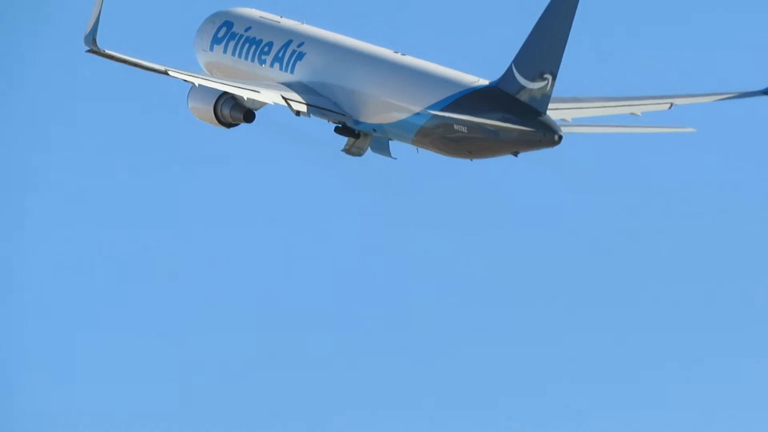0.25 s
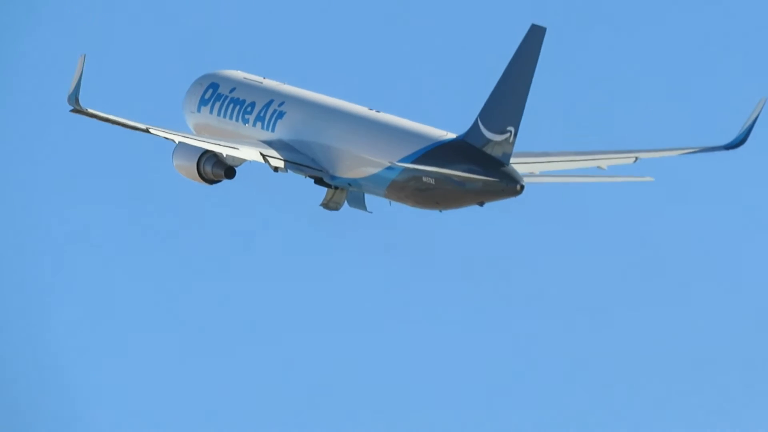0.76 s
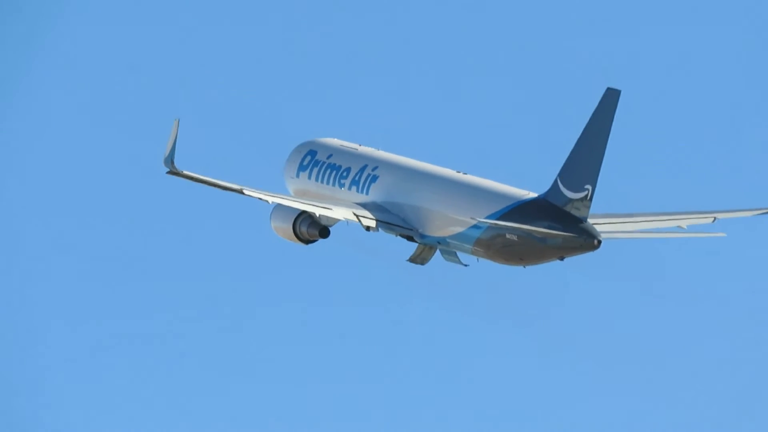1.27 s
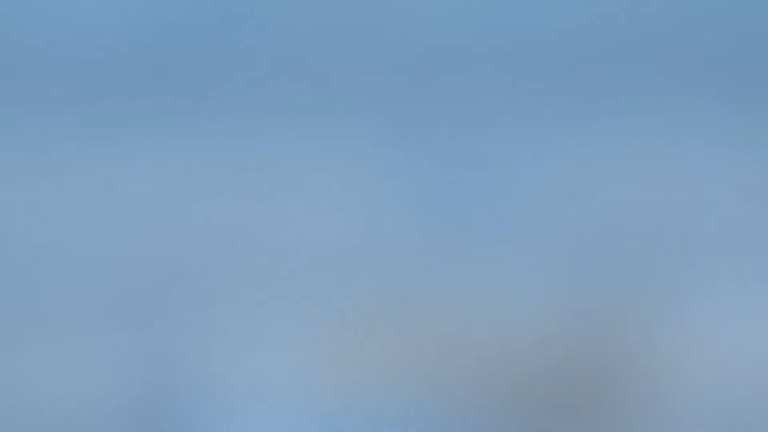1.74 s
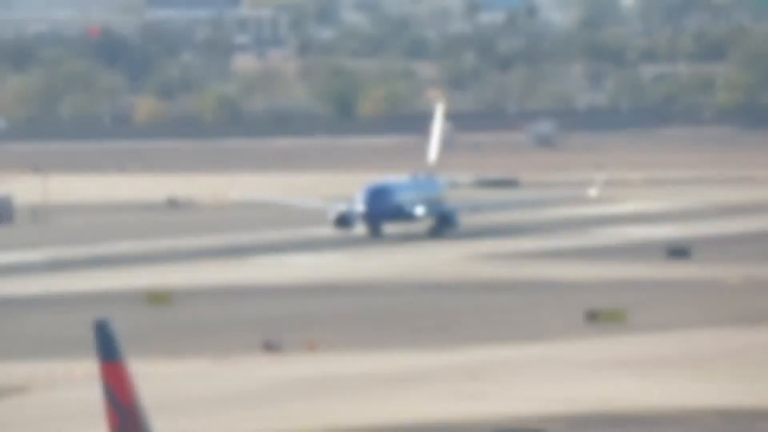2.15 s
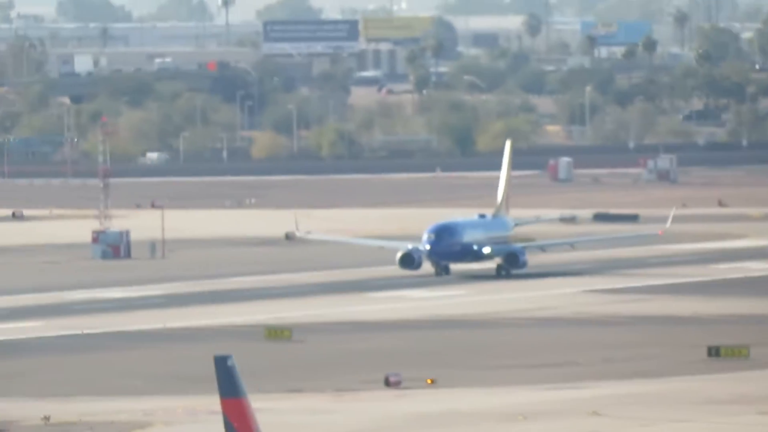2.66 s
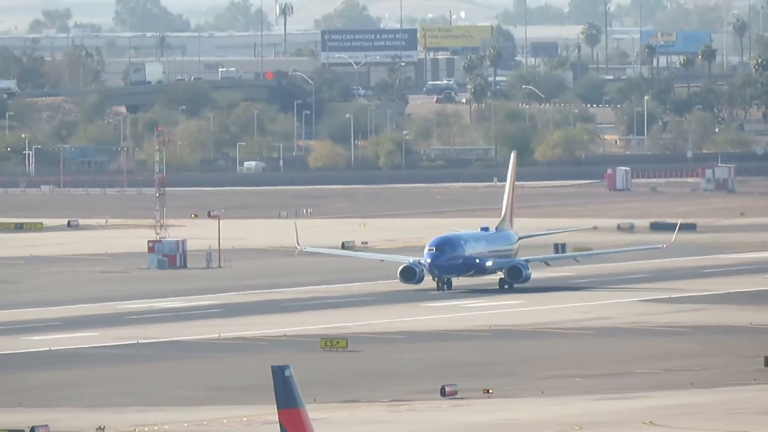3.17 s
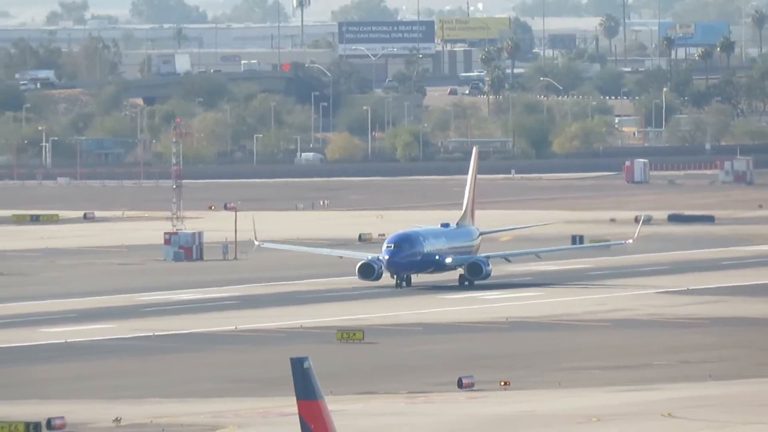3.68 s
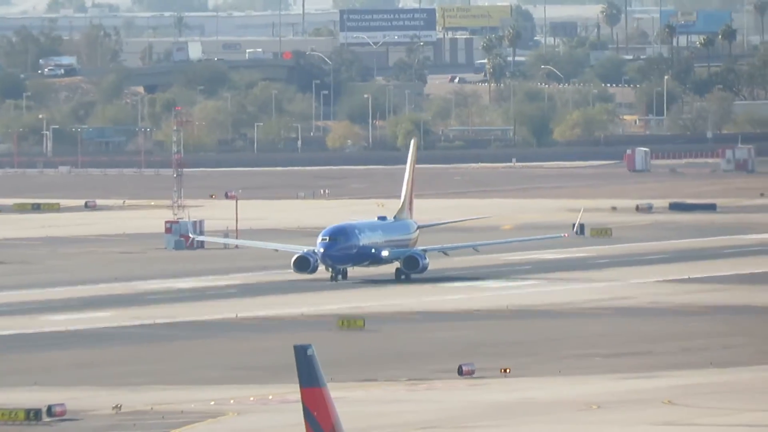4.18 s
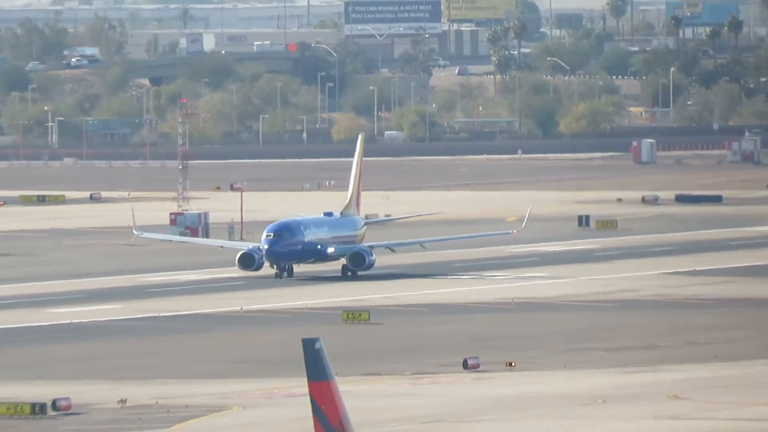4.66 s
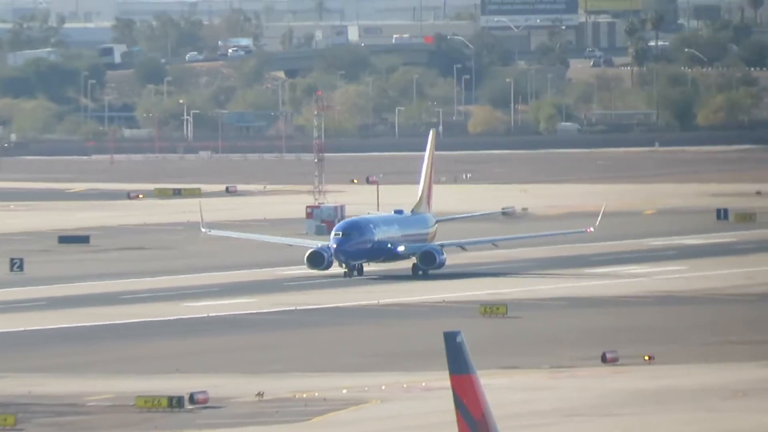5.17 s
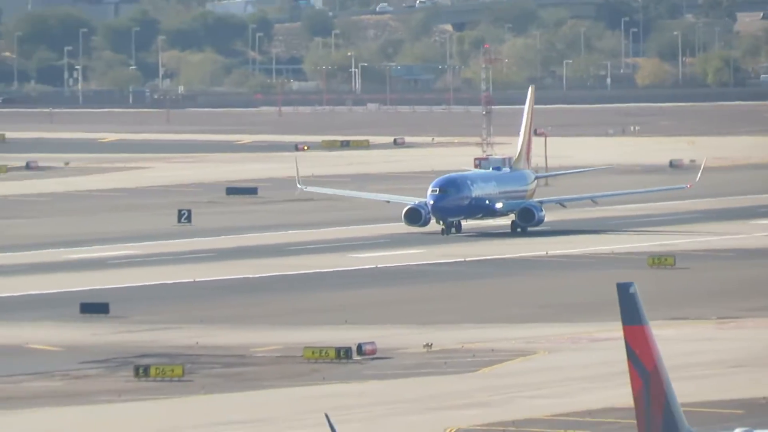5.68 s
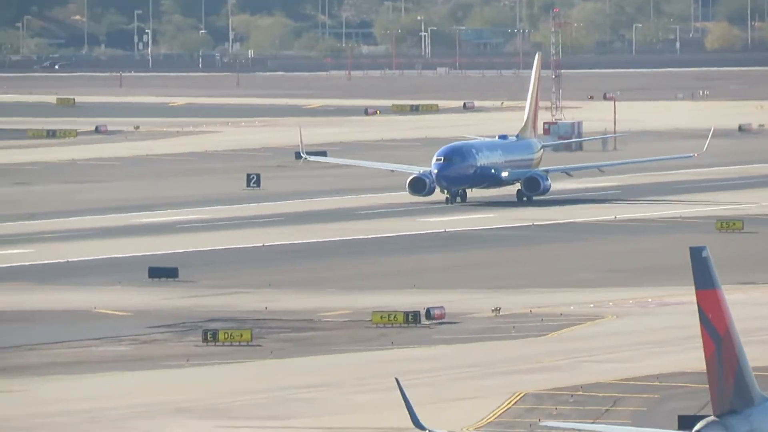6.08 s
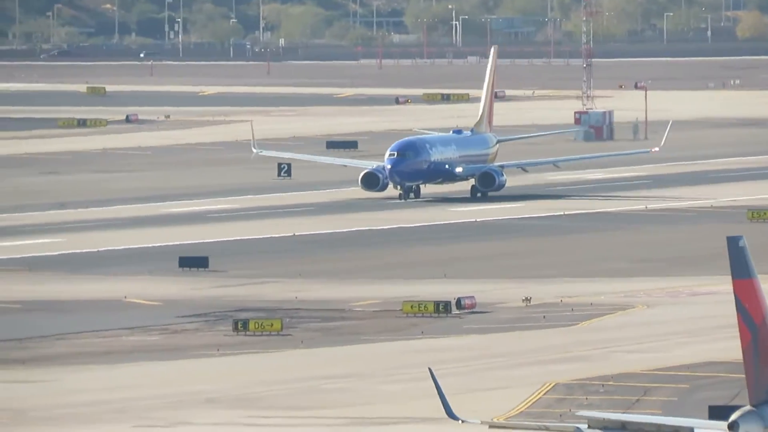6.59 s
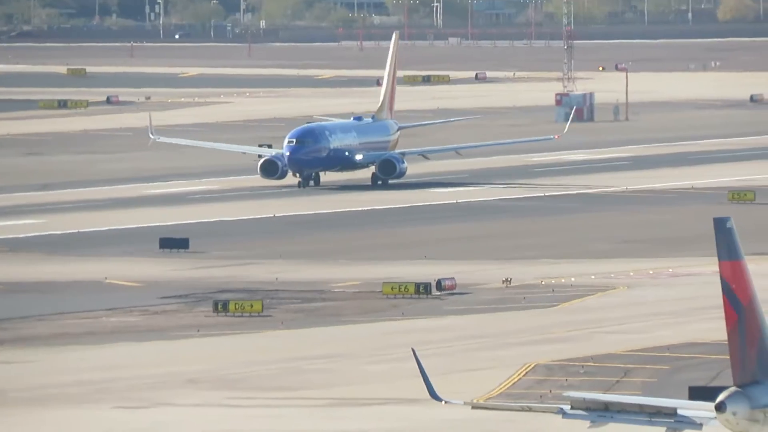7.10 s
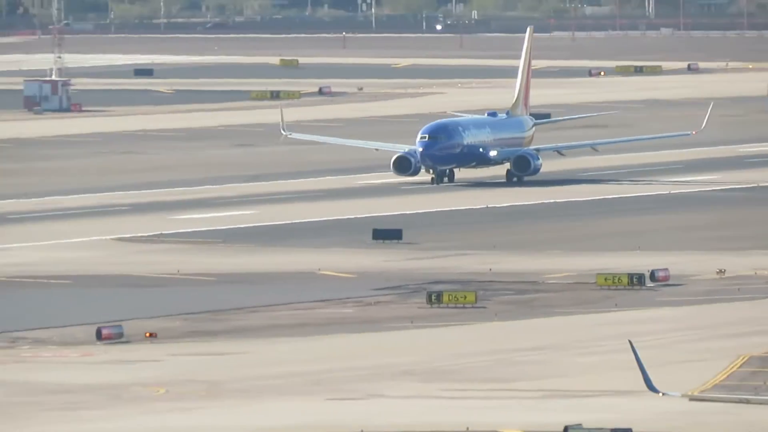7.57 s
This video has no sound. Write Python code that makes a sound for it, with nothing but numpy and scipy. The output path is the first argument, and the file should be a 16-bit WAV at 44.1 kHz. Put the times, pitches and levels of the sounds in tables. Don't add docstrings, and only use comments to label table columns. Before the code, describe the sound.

A climbing airliner roars deeply and unevenly across an open airfield, with a thin fan whine, then draws away. Handling ticks and skin rubbing on a plastic camera shell interrupt as it swings round. A second jet on the runway swells into a broad, steady roar with a faint wavering tone and low hum, still rolling at the end. Small stereo camera microphone, distant view.

```python
import sys
import numpy as np
from scipy import signal
from scipy.fft import rfft, irfft
from scipy.io import wavfile
from scipy.ndimage import uniform_filter1d, map_coordinates

SR = 44100
rng = np.random.default_rng(int(sys.argv[2]) if len(sys.argv) > 2 else 0)


def how_loud(loudness_db):
    steps = np.asarray(loudness_db, float) / 20
    return 10 ** steps


def persist_wave(psi):
    counts = np.round(np.clip(psi, -1, 1) * 32767).astype(np.int16)
    wavfile.write(sys.argv[1], SR, np.atleast_2d(counts).T)


N = 345744
T = np.arange(N) / SR
HZ = np.arange(N // 2 + 1) * SR / N
FRAME = dict(fs=SR, nperseg=1024, noverlap=768)

# (frequency [Hz], climbing jet [dB per Hz], rolling jet [dB per Hz])
EXHAUST = [(22, -63.5, -65), (46, -35, -52.5), (81.6, -38.5, -40.5), (132, -38, -46), (197.7, -42.5, -43.5),
           (237, -47, -50), (365, -49, -53), (983, -58.5, -63.5), (1363, -65, -69), (1915, -76.5, -71),
           (2860, -81, -79.5), (4500, -94.5, -91), (6180, -100.5, -96.5), (8460, -109, -105.5),
           (16600, -124, -123)]
# (frequency [Hz], width [Hz], gain [dB])
HOLLOWS = [(1950, 740, -0.5), (3100, 360, 2), (5800, 900, -3.5), (7550, 820, 0.5)]
# (frequency [Hz], width [Hz], level over roar [dB])
CLIMB_WHINE = [(313, 74, 5.5), (2090, 130, 3), (3881, 40, 1), (4285, 35, 2.5), (4801, 35, 4),
               (5300, 60, 2.5), (5505, 70, 4), (5605, 70, 6), (6062, 50, 5), (6660, 40, 3), (7411, 40, 1)]
ROLL_WHINE = [(777, 4.6, 5.4), (1484, 9.1, 5.3)]
# (frequency [Hz], width [Hz], mean level over roar [dB])
FITFUL_WHINE = [(3970, 60, 3.5), (4290, 46, 3.5), (4750, 80, 2), (5105, 55, 1.5), (5290, 66, 3),
                (5460, 70, 5.5), (5640, 60, 6), (5943, 60, 4.5), (6150, 80, 5.5), (7120, 60, 1),
                (7440, 50, 3), (7700, 50, 6.5), (8177, 90, 3)]
FITFULNESS, FIT_FRAMES = 0.6, 12

# (time [s], level [dB], deepening [dB per octave])
CLIMB_MOTION = [
    (.1, 2.5, 0.5),
    (.45, -0.6, -0.1),
    (.9, 1, 1),
    (1.2, 1.5, 2),
    (1.4, -1, 1.5),
    (1.7, -3.5, 1.5),
    (2.0, -8.5, 1.5),
    (2.4, -12.5, -1.5),
    (3.2, -31, -2),
]
# (time [s], level [dB], air clearness [dB per octave])
ROLL_MOTION = [
    (.2, -6.5, -0.5),
    (1.3, -12.5, 3),
    (1.8, -6, 1.7),
    (2.3, -2.5, 0.6),
    (2.75, 1, 0.2),
    (3.5, -0.5, 0.5),
    (4.2, -1.5, 0.95),
    (5.5, -0.48, -0.2),
    (7.84, -0.4, 0.13),
]
DEEPEN_PIVOT_HZ, CLEAR_ABOVE_HZ = 300, 900
# (start [s], rate [dB/s], from [Hz], to [Hz])
GATHER = (4.8, 1.18, 112, 173)
# (time [s], half length [s], frequency [Hz], lift [dB])
CLIMB_GUSTS = [(.17, 0.15, 1200, 0.5), (0.15, 0.11, 380, -2), (0.046, 0.046, 70, -8), (1.05, 0.12, 460, -3),
               (0.77, 0.11, 1300, -2.5), (0.57, .1, 190, 5.5), (0.47, 0.087, 100, 1.5),
               (.85, 0.072, 65, -16.5), (1.1, 0.079, 120, -3), (1.21, 0.18, 2200, 6.5),
               (1.255, .12, 640, 4.5), (1.55, .12, 190, -2), (1.18, 0.063, 146, -5), (2.08, 0.056, 74, -4),
               (1.2, 0.074, 5000, 7), (1.7, .05, 69, -5), (0.33, 0.09, 860, 1.5), (.55, .07, 700, 2),
               (1.46, 0.073, 170, 1.5), (1.95, 0.15, 150, -4.5), (1.1, 0.055, 720, -3.5)]
ROLL_GUSTS = [(2.72, 0.035, 1800, 3.5), (2.95, 0.12, 111, 2.5), (3.05, 0.084, 210, 2),
              (3.42, 0.053, 1700, 2), (3.5, 0.12, 1050, 1.5), (3.3, 0.14, 300, 4.5), (4.4, .12, 380, 0.5),
              (3.7, 0.1, 210, -1), (3.9, 0.029, 1500, 2), (4.1, 0.14, 110, 2), (4.28, 0.11, 70, 5.5),
              (4.75, 0.08, 179, 1.5), (5.68, 0.048, 65, 3), (7.2, 0.12, 140, 2), (6.35, 0.092, 151, -2.5),
              (5.3, 0.18, 200, 2), (5.35, 0.13, 1290, 2), (5.85, 0.066, 33, 14), (5.95, 0.14, 1300, 2.5),
              (6.1, 0.11, 200, 4.5), (6.7, 0.11, 1510, 1), (6.9, 0.11, 111, -2), (7.1, 0.16, 1400, 1),
              (2.71, .04, 2600, 1.5), (2.85, .08, 990, 1), (3.44, 0.042, 2300, -1), (3.62, .06, 1100, -1),
              (4.25, 0.076, 60, -5), (4.6, .12, 420, 1), (5.85, 0.12, 105, -5), (6.4, 0.093, 161, 2),
              (7.2, 0.08, 268, -3.5)]
GUST_OCTAVES = 0.34

# (multiple [-], level [dB rms])
FAN = [
    (1, -43),
    (2, -52),
    (3, -63),
]
FAN_HZ, FAN_DB, OVERTONE_DB = 812.9, -7.5, -1
OVERTONE_SHARE = 0.16
# (time [s], half length [s], lift [dB])
FAN_SPELLS = [(0.397, .12, 18), (1.148, 0.22, 19.5), (1.95, 0.11, 9.5), (2.697, 0.08, 7), (3.003, 0.26, 6),
              (3.38, 0.12, 10.5), (3.996, 0.058, 12), (4.368, .1, 12), (4.796, .08, 12), (5.296, 0.1, 8.5),
              (5.7, 0.078, 7), (5.962, 0.16, 10), (6.556, .15, 11.5), (7.303, 0.23, 11.5),
              (7.783, 0.055, 12)]
# (time [s], half length [s], frequency [Hz], level [dB rms])
OTHER_FAN = (6.15, .4, 778, -45)
SHAFT_HZ, SHAFT_HZ_PER_S, SHAFT_DB = 62, 1.9, -34
SHAFT_START_S, SHAFT_END_S = 2.0, 6.5

# (time [s], bearing [-1 right to 1 left], favoured frequency [Hz])
SWING = [
    (0, -0.6, 5560),
    (1.3, -0.7, 5620),
    (1.65, -1.25, 5700),
    (1.85, -1.3, 5800),
    (2.0, 0.92, 6130),
    (2.3, 0.65, 6300),
    (3.8, 0.54, 6070),
    (4.5, 0.61, 5550),
    (7.84, 0.66, 5700),
]
FAVOUR_DB, FAVOUR_HZ = 4, 700
# (frequency [Hz], left lead [rad], left minus right [dB], diffuse share [dB])
PORTS = [(25, 0.16, -4.5, -38.5), (125, 0.14, 4.5, -31.5), (210, 0.26, -4.5, -28.5),
         (300, 0.24, -0.5, -19.5), (420, 0.18, -0.5, -23.5), (900, 0.4, 0.9, -27), (1600, 0.44, 1, -17),
         (2980, 0.4, 4, -8), (4570, 1.2, 3, -6.5), (7100, 1.4, 4.5, -0.5), (8300, 0.31, 1, -1),
         (9150, 1.6, 0.5, -10), (11500, 0.1, 3.5, -7.5)]
# (time [s], cover [0-1])
FINGER = [
    (0, 0),
    (2.152, 0),
    (2.158, 1.0),
    (2.232, 1.0),
    (2.25, .6),
    (2.274, .8),
    (2.282, 0),
    (7.84, 0),
]
# (frequency [Hz], gain [dB])
SHADE = [(1300, 0), (1750, -8), (2100, -7), (2600, -7), (3100, -9), (4200, -10), (6000, -6), (9000, -4),
         (14000, -10.5)]

# (time [s], peak [dB], rattle [ms], brightness [dB per octave], nearness to one port [0-1])
TICKS = [(1.295, -25, .3, -10, 0.83), (1.6125, -45, 1.8, 8, .5), (1.6158, -14, .3, 3, 0.8),
         (1.6651, -33, .3, 7, 0.84), (1.7125, -37, 1.5, 3, 0.4), (1.7165, -41, .5, 8, .6),
         (1.7465, -36, .3, -16, 0.8), (1.78, -25, 3, -14.5, 1.0), (1.8165, -48, .5, 10, .6),
         (1.8283, -40, .5, 8, .5), (1.8315, -32, .5, 2, 0.6), (1.838, -43, .5, 5.5, .6),
         (1.8507, -26, 1.5, 3.5, 0.7), (1.8545, -34.5, 1, 9.5, .6), (2.1455, -26.5, 2, -1, 1),
         (2.149, -29, 2, -2, .8), (2.2421, -36, 2, -8, .8), (2.2662, -30, .3, 4, 1)]
# (frequency [Hz], level [dB], t60 [s], right port against left [-1 to 1])
SHELL = [(624, -21, 0.043, -1), (1100, -19, .025, -.9), (1680, -15, 0.018, -.7), (2160, 1, 0.02, 0.21),
         (2640, 0, 0.015, 1), (2860, -8, 0.0092, .8), (3230, -3, 0.016, -0.49), (3760, -10, 0.016, 0.92),
         (4300, -8.5, 0.01, 0.81), (4620, -4, 0.011, -0.99), (5200, -15, 0.008, .7),
         (5930, -19, 0.0076, 0.64), (6200, -11, 0.0061, 0.59), (6900, -20.5, .005, .6),
         (7600, -22, .006, .3), (9000, -24, .005, .3), (10330, -25, 0.006, .5),
         (11300, -22.5, 0.005, -0.13), (12300, -27, .004, -.4), (13900, -38, .002, -.4)]
# (time [s], length [s], frequency [Hz], width [Hz], level [dB rms], right against left [ratio])
RUBS = [(1.64, .26, 330, 160, -39, -1.2), (1.95, 0.2, 3300, 300, -55, -1.1),
        (1.8, 0.18, 2200, 250, -48, -1.2), (1.97, .025, 2200, 200, -41, -0.87),
        (1.708, 0.021, 1700, 400, -43, -1), (1.812, .025, 1800, 500, -39, -1),
        (1.682, 0.055, 10300, 3000, -67, .7), (1.704, .028, 11200, 2600, -66, .5),
        (1.798, 0.05, 10000, 4000, -63, 0.8), (1.81, 0.028, 5600, 300, -54, 0.7),
        (1.846, .028, 11000, 2600, -63, .5), (1.849, .009, 4400, 700, -51, .8),
        (1.849, .009, 5900, 800, -55, .8), (1.849, .009, 7800, 1500, -59, .7),
        (2.145, .011, 2000, 250, -41, .6), (2.146, .011, 2650, 250, -43, .8),
        (2.145, .009, 4450, 400, -48, .9), (2.146, .008, 6100, 500, -58, .8),
        (2.157, 0.075, 3000, 250, -55, 0.7), (2.248, .014, 2900, 250, -50, .7),
        (2.283, 0.025, 6150, 200, -53, .6)]
SETTLE_S = 0.0007


def on_log(hz, points_hz, values):
    return np.interp(np.log(np.maximum(hz, 1)), np.log(points_hz), values)


def curve(s, table):
    table = np.array(table)
    return [np.interp(s, table[:, 0], column) for column in table.T[1:]]


def bell(x, centre, half):
    return np.exp(-.5 * ((x - centre) / half) ** 2)


def walk(shape, span):
    span = max(int(span), 1)
    slow = uniform_filter1d(uniform_filter1d(rng.standard_normal(shape), span), span)
    return slow / slow.std()


def jet(colour_db, whines):
    grid_hz = HZ[::8]
    humps_db = sum(db * bell(grid_hz, hz, .5 * width) for hz, width, db in whines + HOLLOWS)
    colour = on_log(grid_hz, np.array(EXHAUST)[:, 0], colour_db)
    gain = how_loud(np.interp(HZ, grid_hz, colour + humps_db))
    return irfft(rfft(rng.standard_normal(N)) * gain, N) * np.sqrt(SR / 2)


def air(hz, count, gust_db=-0.9, patch_db=1.02, shimmer_db=0.7):
    octave = np.log2(np.maximum(hz, 30) / 30)

    def spread(field):
        rows = octave * (len(field) - 1) / 10
        return map_coordinates(field, np.meshgrid(rows, np.arange(count), indexing="ij"), order=1)

    treble = np.clip(octave - 5.6, 0, 1.4)[:, None]
    swell = gust_db * spread(walk((8, count), 38))
    patches = patch_db * spread(walk((40, count), 5))
    shimmer = shimmer_db * treble * walk((1, count), 2.7)
    return swell + patches + shimmer


def gusts(hz, s, table):
    at, half, gust_hz, db = np.transpose(table)
    part = bell(np.log2(np.maximum(hz, 1))[:, None], np.log2(gust_hz), GUST_OCTAVES)
    return (db * part) @ bell(s[:, None], at, half).T


def climbing(hz, s):
    level_db, deep = curve(s, CLIMB_MOTION)
    octaves = np.log2(np.clip(hz, 40, 2500) / DEEPEN_PIVOT_HZ)
    return level_db + gusts(hz, s, CLIMB_GUSTS) - np.outer(octaves, deep)


def fitful(hz, count):
    centre_hz, width, db = np.transpose(FITFUL_WHINE)
    flare = np.clip(1 + FITFULNESS * walk((len(db), count), FIT_FRAMES), 0, 1.8)
    return bell(hz[:, None], centre_hz, .5 * width) @ (db[:, None] * flare)


def rolling(hz, s):
    level_db, clear = curve(s, ROLL_MOTION)
    start, rate_db, low_hz, high_hz = GATHER
    upward = on_log(hz, [45, 65, low_hz, high_hz, 2 * high_hz], [0.038, -0.9, -1.1, 1, 0.0097])
    speed_db = np.outer(upward, rate_db * np.maximum(s - start, 0))
    clear_db = np.outer(np.log2(np.clip(hz / CLEAR_ABOVE_HZ, 1, 10)), clear)
    return level_db + fitful(hz, len(s)) + gusts(hz, s, ROLL_GUSTS) + clear_db + speed_db


def fan():
    wander = np.repeat(walk((5, N // 64 + 1), 45), 64, axis=1)[:, :N]
    wander = uniform_filter1d(wander, size=64)
    spell_db = sum(db * bell(T, at, half) for at, half, db in FAN_SPELLS)
    turns = np.cumsum(FAN_HZ * (1 + 0.00069 * wander[0])) / SR
    tone = how_loud(FAN[0][1] + FAN_DB + spell_db + 1.3 * wander[1]) * np.sin(2 * np.pi * turns)
    for k, db in FAN[1:]:
        level_db = db + OVERTONE_DB + OVERTONE_SHARE * spell_db + 2.5 * wander[k]
        tone += how_loud(level_db) * np.sin(2 * np.pi * k * turns)
    at, half, hz, db = OTHER_FAN
    other = how_loud(db + 1.2 * wander[4]) * bell(T, at, half) * np.sin(2 * np.pi * hz * T)
    return np.sqrt(2) * (tone + other)


def airfield():
    _, climb_db, roll_db = np.transpose(EXHAUST)
    sources = [(jet(climb_db, CLIMB_WHINE), jet(climb_db, []), climbing),
               (jet(roll_db, ROLL_WHINE) + fan() + shaft(), jet(roll_db, []), rolling)]
    hz, s, _ = signal.stft(T, **FRAME)
    bearing, favoured_hz = curve(s, SWING)
    favour_db = FAVOUR_DB * bell(hz[:, None], favoured_hz, .5 * FAVOUR_HZ)
    port_hz, *columns = np.transpose(PORTS)
    lead, louder_db, diffuse_db = (on_log(hz, port_hz, c)[:, None] for c in columns)
    apart = np.minimum(hz / 800, 1)[:, None] ** 2
    lead, louder_db = lead * apart, louder_db * apart
    shade_db = np.outer(on_log(hz, *np.transpose(SHADE)), np.interp(s, *np.transpose(FINGER)))
    side = np.array([1, -1])[:, None, None]
    louder_db = louder_db * np.where(hz[:, None] < 1450, 1, bearing)
    ports = np.exp(.5j * side * lead * bearing) * how_loud(.5 * side * louder_db)
    scatter = side * how_loud(diffuse_db + 0.4 * shade_db)
    field = 0
    for direct, scattered, motion in sources:
        gain = how_loud(air(hz, len(s)) + motion(hz, s) + favour_db)
        direct = signal.stft(direct, **FRAME)[2]
        scattered = signal.stft(scattered, **FRAME)[2]
        field = field + gain * (how_loud(shade_db) * ports * direct + scatter * scattered)
    return signal.istft(field, **FRAME)[1][:, :N]


def ticks():
    out, t = np.zeros((2, N)), np.arange(3000) / SR
    hz, db, t60, across = (c[:, None] for c in np.transpose(SHELL))
    ring = np.sin(2 * np.pi * hz * t) * 1000 ** (-t / t60) * (1 - np.exp(-(t / 0.00018) ** 2))
    for s, peak_db, rattle_ms, bright_db, near in TICKS:
        luck = rng.standard_normal(600)
        rattle = 0.11 * luck ** 3 * (np.abs(luck) > 1.6) * (t[:600] < rattle_ms / 1000)
        rattle[0] = 1
        uneven_db = 0.83 * rng.standard_normal(hz.shape)
        rings = how_loud(db + bright_db * np.log2(hz / 2700) + uneven_db) * ring
        right = rings * (1 - near + near * across)
        pair = np.array([rings.sum(axis=0), right.sum(axis=0)])
        pair = signal.fftconvolve(pair, rattle[None])
        at = int(s * SR)
        out[:, at:at + pair.shape[1]] += how_loud(peak_db) * pair / np.abs(pair).max()
    return out


def shaft():
    since = T - SHAFT_START_S
    heard = np.clip((since + .5) / .5, 0, 1) * np.clip((SHAFT_END_S + 0.55 - T) / 0.98, 0, 1)
    waver_db = 3.4 * np.repeat(walk(N // 64 + 1, 90), 64)[:N]
    turns = (SHAFT_HZ + SHAFT_HZ_PER_S * since / 2) * since
    return np.sqrt(2) * how_loud(SHAFT_DB + waver_db) * heard * np.sin(2 * np.pi * turns)


def rubs():
    out = np.zeros((2, N))
    for s, length, hz, width, db, across in RUBS:
        grain = rng.standard_normal(12000) * how_loud(3.5 * walk(12000, 25))
        band = signal.butter(2, [hz - width / 2, hz + width / 2], "band", fs=SR, output="sos")
        ring = signal.sosfilt(band, grain)[-int(length * SR):]
        slide = how_loud(db) * ring / ring.std() * np.sqrt(np.hanning(len(ring)))
        at = int(s * SR)
        out[:, at:at + len(ring)] += slide * np.array([[1], [across]])
    return out


def scene():
    return airfield() + ticks() + rubs()


def low_pass(x):
    return signal.sosfilt(signal.butter(12, 15150, fs=SR, output="sos"), x)


def record(dry):
    ease = np.sin(np.pi / 2 * np.minimum(T / SETTLE_S, 1)) ** 2
    mix = np.tanh(1.078 * dry) / 1.123 * ease
    return low_pass(mix)


dry = scene()
out = record(dry)
persist_wave(out)
```